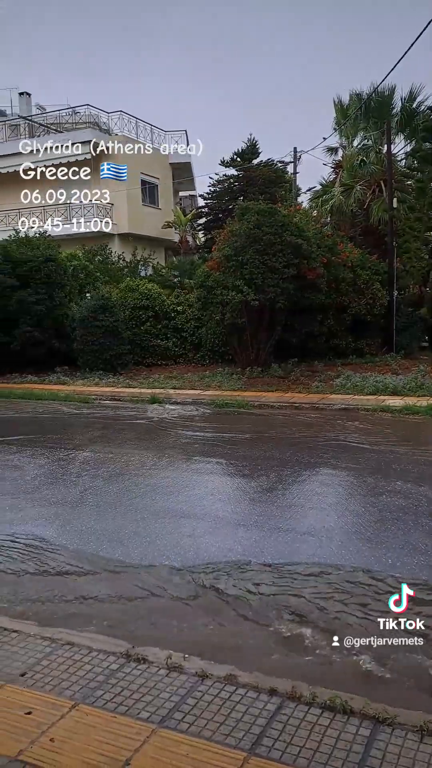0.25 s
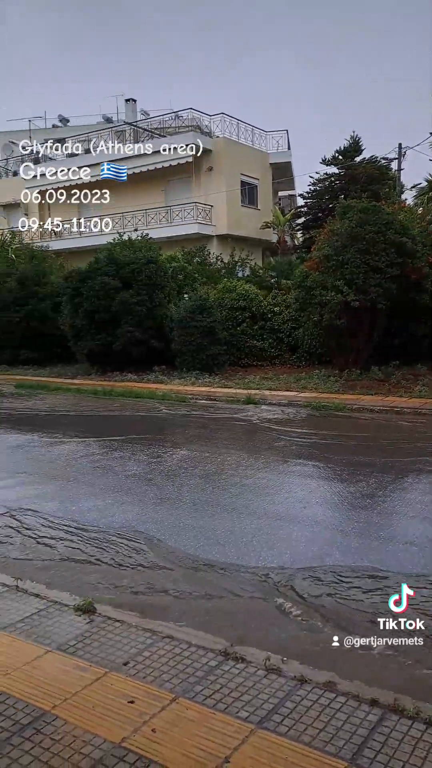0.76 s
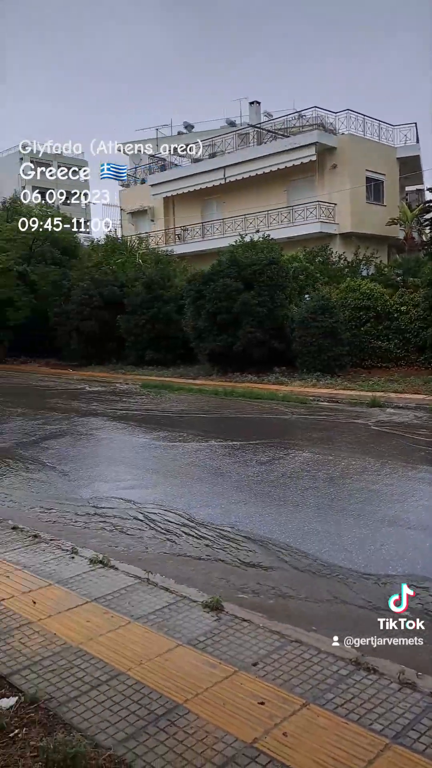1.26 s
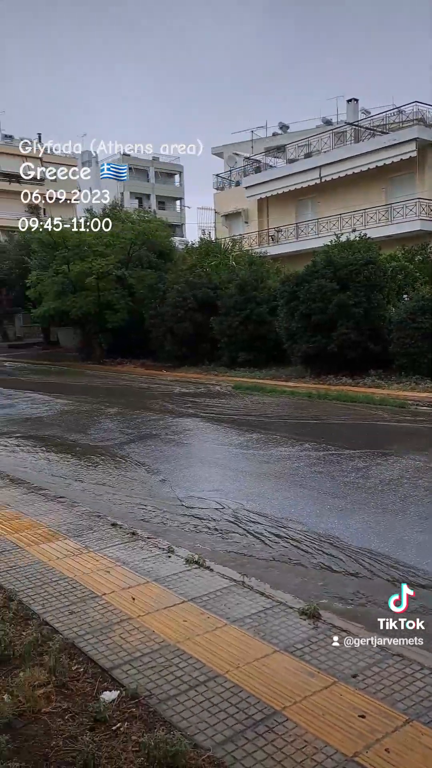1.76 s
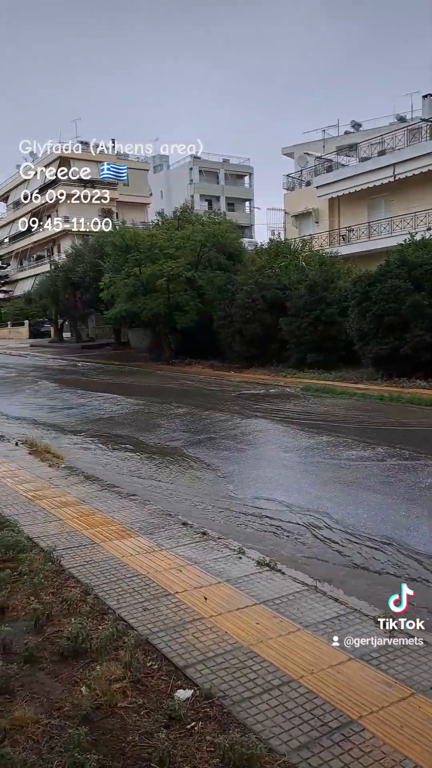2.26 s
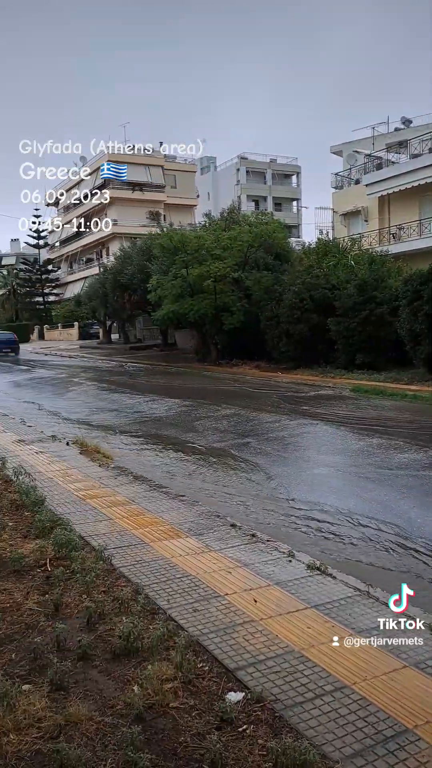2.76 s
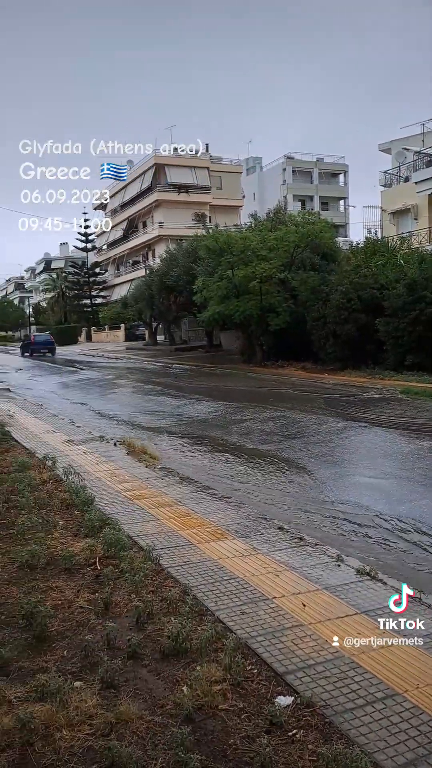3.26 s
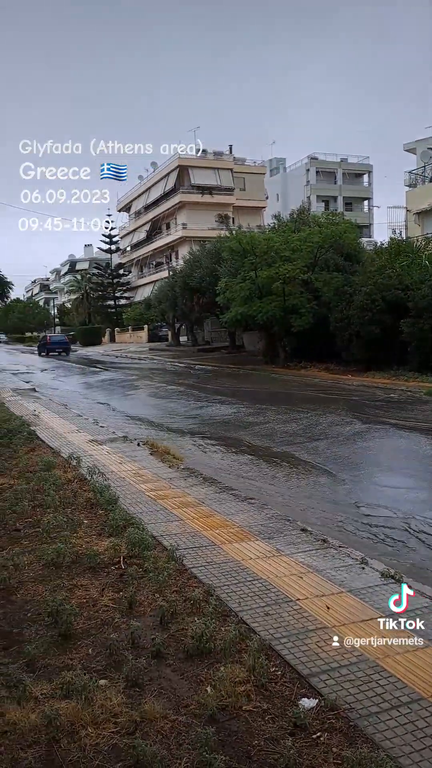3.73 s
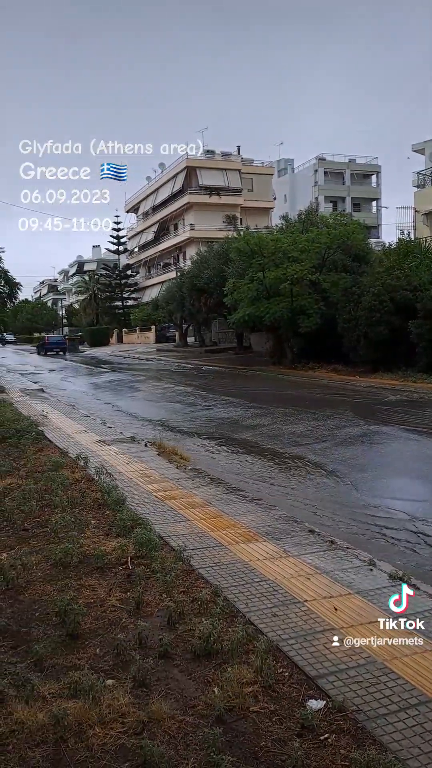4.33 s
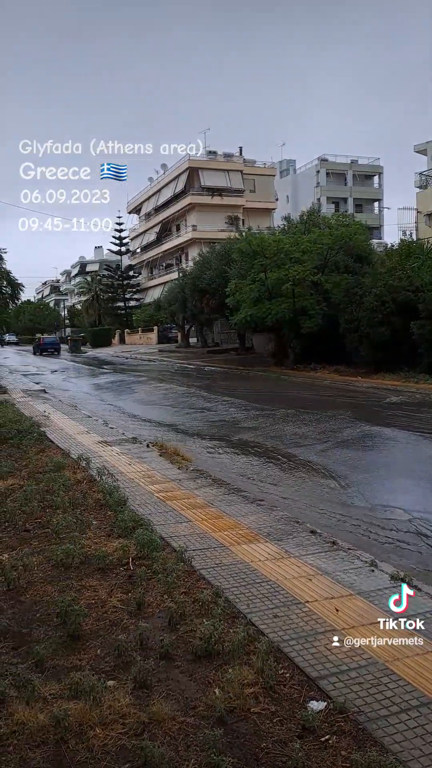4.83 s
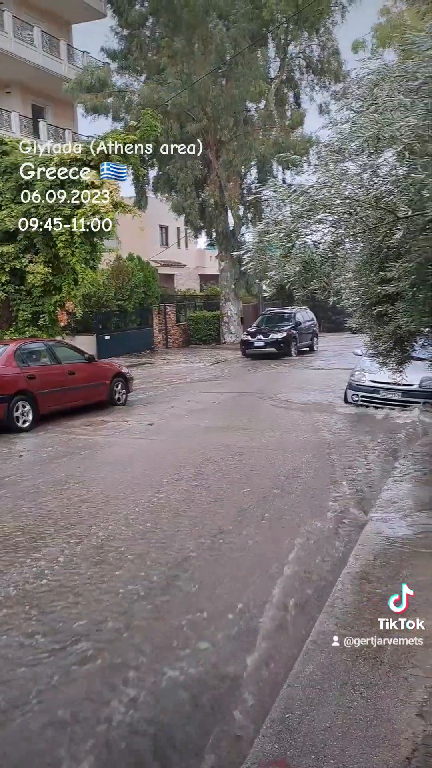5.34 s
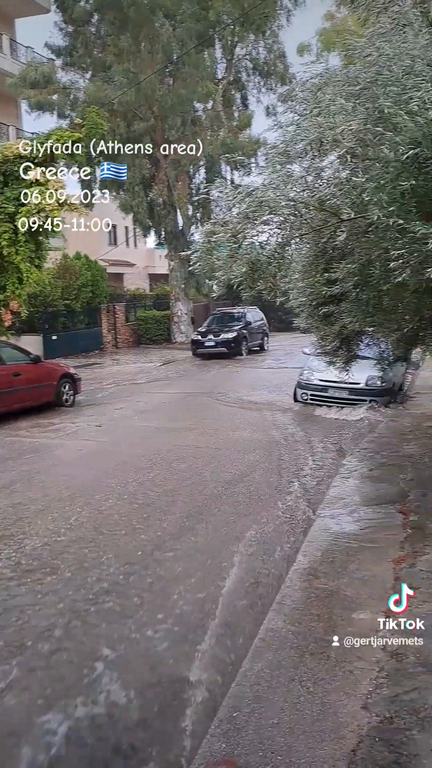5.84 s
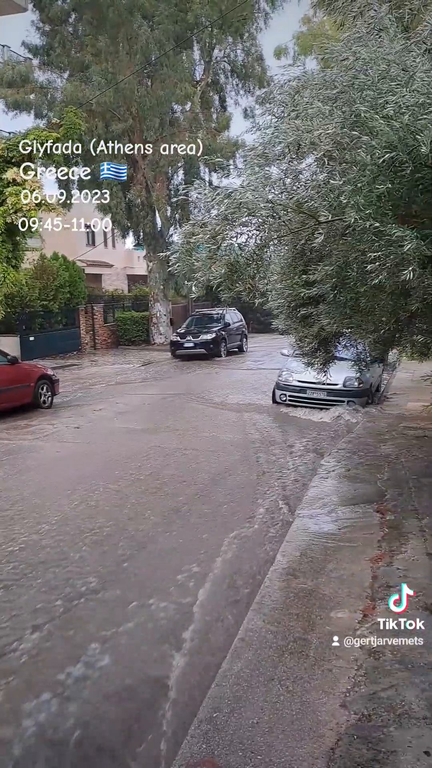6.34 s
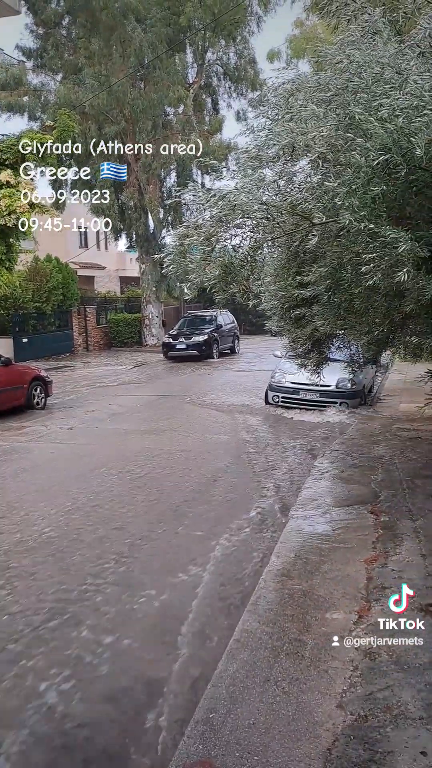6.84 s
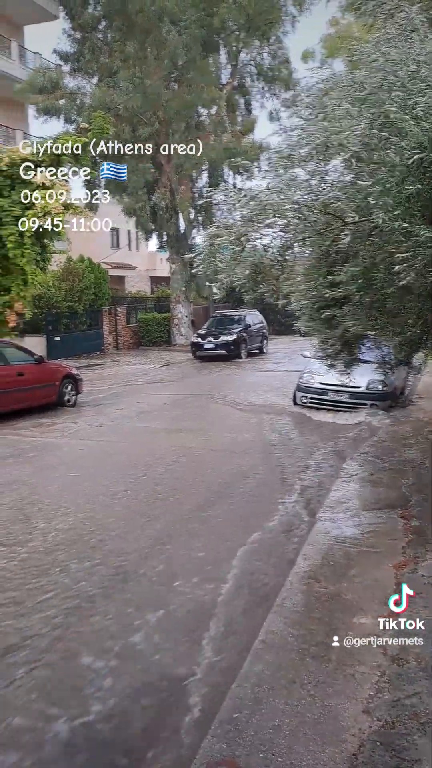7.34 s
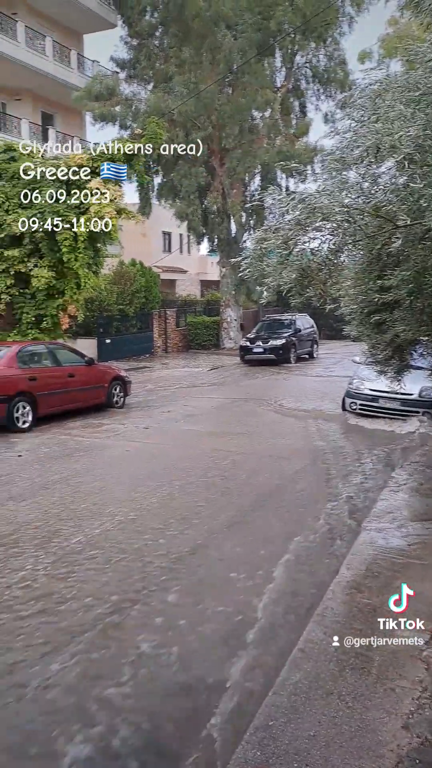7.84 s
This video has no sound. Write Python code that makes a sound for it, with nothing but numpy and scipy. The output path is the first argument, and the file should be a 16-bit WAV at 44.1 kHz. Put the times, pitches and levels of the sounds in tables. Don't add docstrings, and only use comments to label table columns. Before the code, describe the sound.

Tyres hiss through standing water on a wide road, muffled and lopsided, then a cut to a close rushing gutter torrent with ticking drops.

```python
import sys
import numpy as np
from scipy import signal
from scipy.fft import rfft, irfft
from scipy.io import wavfile
from scipy.ndimage import uniform_filter1d

SR = 44100
rng = np.random.default_rng(int(sys.argv[2]) if len(sys.argv) > 2 else 0)


def to_wav(s):
    ch = np.atleast_2d(s).T
    pcm = np.round(np.clip(ch, -1, 1) * 32767)
    wavfile.write(sys.argv[1], SR, pcm.astype(np.int16))


def how_loud(loudness_db):
    steps = np.asarray(loudness_db, float) / 20
    return 10 ** steps


N = 356769

# (time [s], level [dB])
FLOW = [
    [(0.02, 4.5), (0.6, 5), (1.3, 4.5), (2.0, 3), (2.55, 0.5), (2.8, -2.5), (3.5, -1.5), (4.222, -3.5)],
    [(4.223, -5), (4.65, -3.3), (4.86, -6.5)],
    [(5.0, -0.7), (5.1, 1), (5.3, -1.2), (5.8, -0.1), (6.3, -1.2), (7.25, -0.1), (8.07, -0.2)],
]
# (start [s], end [s], rise [s], fall [s], right port lag [samples])
VIEWS = [
    (-1.5, 3.0, 1.5, 1.5, 7),
    (1.5, 4.2225, 1.5, .001, 7),
    (4.2215, 4.9125, .001, .0004, 7),
    (4.9355, 8.1, .012, .001, 2),
]
# (frequency [Hz], road [0-1], gutter [0-1])
LIKENESS = [(60, .99, .97), (250, .96, .86), (650, .92, .7), (1100, .62, .2), (1600, .62, .2),
            (2600, .47, .25), (4000, .12, .08)]
# (time [s], delay [ms], strength [0-1])
GROUND = [(0, 1.06, 0.18), (0.5, 1.14, 0.22), (1.3, 1.25, 0.3), (2.2, 1.3, 0.25), (4.2, 1.36, 0.14),
          (4.9, 1.3, 0.12), (5, 1.3, 0.03)]
# (frequency [Hz], share [0-1])
FOLLOWS = [(90, 0.05), (900, 0.51), (3000, 0.83), (10000, 0.44)]
# (frequency [Hz], level [dB per Hz])
ROAD_BASS = [(20, -93), (32, -57), (48, -53.5), (105, -53), (175, -62), (250, -59)]
GUTTER_BASS = [(20, -77), (32, -60), (42, -49), (75, -50.5), (115, -57.5), (165, -59), (260, -54)]
# (frequency [Hz], level [dB per Hz])
BLOCKED_LEFT = [(330, -62), (480, -61.5), (810, -56.5), (1000, -48.5), (1110, -45.5), (1470, -61),
                (3170, -94), (3450, -184), (4550, -111.3), (6910, -118.0), (11410, -109.8), (15500, -118.0)]
WET_RIGHT = [(330, -59.5), (540, -67.5), (870, -61.5), (1420, -60), (1650, -58.5), (3000, -62.5),
             (3450, -57), (4000, -64.5), (6360, -85.5), (6910, -85.5), (10210, -78), (12410, -89),
             (13120, -99.1), (15070, -103.4), (15500, -118.0)]
TURNED_RIGHT = [(330, -59.5), (480, -64), (750, -60.5), (1010, -64), (1270, -61.5), (1470, -57.5),
                (2780, -60.5), (3650, -57), (6020, -86.5), (7310, -84.5), (8400, -79.5), (10210, -77),
                (12410, -92), (15500, -118.0)]
FILM_RIGHT = [(330, -62), (1220, -63.5), (1530, -59.5), (1840, -60.5), (2060, -60.5), (3170, -67.5),
              (4820, -62.5), (5380, -76), (6360, -83.5), (9390, -81), (11100, -70.5), (14260, -96),
              (14660, -118.0), (15500, -118.0)]
OPEN_LEFT = [(330, -54.5), (410, -55.5), (700, -52.5), (1090, -56), (1470, -55), (3750, -62), (5850, -61.5),
             (7310, -70.5), (12410, -73.5), (14660, -79.5), (15070, -81.8), (15500, -68)]
OPEN_RIGHT = [(330, -55), (520, -57.5), (720, -53.5), (940, -56), (1650, -54), (2780, -61.5), (4680, -62),
              (5380, -63.5), (7310, -68), (9930, -70), (12070, -58), (13870, -62.5), (15450, -62.5),
              (15750, -90)]
LEFT_TRIM_DB = [-1.4, 0.055, -0.38, 0.14]
# (time [s], peak level [dB], frequency [Hz])
ROAD_DROPS = [
    (0.7871, -33, 9500),
    (0.8854, -35, 9000),
    (1.484, -15, 9850),
    (2.3825, -41, 11000),
    (4.2213, -34, 9850),
]
GUTTER_DROPS = [(5.2632, -17, 13000), (5.3825, -17, 11900), (5.6174, -17, 12900), (5.7057, -11, 12400),
                (5.8145, -11, 14100), (5.8529, -12, 13500), (5.9901, -15, 12700), (6.0824, -7, 13600),
                (6.1752, -11, 14200), (6.2924, -20, 13700), (6.3193, -18.5, 12100), (6.3752, -16, 13400),
                (6.4465, -15, 13600), (6.6112, -12, 13800), (6.8791, -17, 12600), (6.896, -16, 14000),
                (6.9873, -13, 12800), (7.0357, -15, 12600), (7.156, -15, 12800), (7.2208, -20, 13100),
                (7.3989, -19, 12100), (7.4892, -19, 12100), (7.7391, -15, 12900), (7.789, -16, 13000)]
# (time [s], peak level [dB], frequency [Hz],
# left minus right [dB])
SPLASHES = [
    (5.124, -10.5, 800, 6),
    (5.749, -16, 1050, -9),
    (6.443, -12.5, 790, 1.5),
    (7.279, -10, 771, -7),
    (5.62, -17, 750, 0),
    (7.95, -15, 790, 0),
            (0.1164, -11, 2010, -19),
    (0.828, -6, 3420, -41),
    (1.0395, -26, 3300, -22),
    (1.8682, -15, 1650, -17),
    (1.9535, -12, 3130, -24),
    (3.5325, -11, 3700, -37),
]
PLINKS = [
    (2.5283, -30, 5900, -30),
    (6.393, -17, 3900, 1),
    (6.869, -21, 3760, 0),
]
# (start [s], length [s], first frequency [Hz], last frequency [Hz], level [dB])
MOTORS = [(0.1, 0.86, 238, 253, -44), (0.298, 0.85, 307, 326.6, -43.5), (0.3, 0.78, 98, 93.6, -39.5),
          (0.65, 0.87, 190, 204, -46), (1.3, 0.64, 47, 55.9, -39), (1.8, 1.16, 150.3, 167.2, -43.5),
          (2.152, 0.94, 46.6, 54.5, -39), (2.395, 2.6, 101, 128, -43.5), (3.397, 1.1, 45, 55.3, -40),
          (4.8, 1.5, 198.4, 196, -41), (4.9, 1.2, 46.8, 45.6, -36.5), (5.4, 0.38, 64.2, 67.6, -32.5),
          (6.296, 0.6, 60.9, 67.8, -34), (6.845, 1.15, 68.6, 66.5, -33), (6.8, 1.45, 195.6, 197, -45.5),
          (7.45, 0.57, 83, 78.3, -44)]

GUTTER_START_S = VIEWS[-1][0]
MOTOR_FADE_S = 0.12
RIGHT_VENT_HZ, SELF_NOISE_DB = 32, -59


def water(grain_share, bubble_share, patchy_db, surge_db):
    swell_db, = in_time(np.vstack(FLOW))
    gutter = np.arange(N) / SR > GUTTER_START_S
    grain = np.clip(grain_share, 0, 1)
    rain = np.array([impacts(per_s=2500, spread_db=3.5), impacts(per_s=3800, spread_db=12.5)])
    white = np.sqrt(1 - grain) * rng.standard_normal((2, 2, N)) + np.sqrt(grain) * rain
    pops = impacts(per_s=1500, spread_db=4)
    dealt = rng.integers(0, 20, N)
    surge = drift(4.0) + 0.8 * drift(14.0)
    edges = 15 * 2 ** np.arange(0, 10.1, 0.5)
    out = 0
    for k, (low, high) in enumerate(zip(edges, np.r_[edges[1:-1], 17500])):
        band = signal.butter(2, [low, high], "band", fs=SR, output="sos")
        mid, side = signal.sosfilt(band, white[k % 2])
        hz = np.sqrt(low * high)
        if 400 < hz < 5000:
            bubbles = rms_one(ring(pops * (dealt == k), hz * rng.uniform(0.87, 0.98), 5.1 / hz))
            mid = np.sqrt(1 - bubble_share) * mid + np.sqrt(bubble_share) * np.std(mid) * bubbles
        alike = np.where(gutter, at_hz(LIKENESS, hz, order=2), at_hz(LIKENESS, hz))
        alike = np.clip(alike, 0, 1)
        bright = np.clip(np.log2(hz / 250) / 4, 0, 1)
        flicker_db = bright * (surge_db * surge + patchy_db * drift(30.0))
        gain = how_loud(at_hz(FOLLOWS, hz) * swell_db + flicker_db)
        stereo = np.sqrt((1 + alike) / 2) * mid + np.sqrt((1 - alike) / 2) * side * [[1], [-1]]
        out = out + gain * stereo
    return out


def impacts(per_s, spread_db):
    sizes = how_loud(spread_db * np.minimum(rng.exponential(1, N), 3)) * rng.choice([-1, 1], N)
    return rms_one(sizes * (rng.random(N) < per_s / SR))


def ground_echo(x):
    delay_ms, strength = in_time(GROUND)
    late = [np.interp(np.arange(N) - delay_ms * SR / 1000, np.arange(N), c) for c in x]
    return (x + strength * np.array(late) * [[0.1], [1]]) / np.sqrt(1 + strength ** 2)


def ports(wash):
    t, out = np.arange(N) / SR, np.zeros((2, N))
    road = [(ROAD_BASS, BLOCKED_LEFT, right) for right in (WET_RIGHT, TURNED_RIGHT, FILM_RIGHT)]
    colours = road + [(GUTTER_BASS, OPEN_LEFT, OPEN_RIGHT)]
    vented = signal.lfilter(*signal.butter(1, RIGHT_VENT_HZ, "high", fs=SR), wash[1])
    for view, (bass, left, right), trim_db in zip(VIEWS, colours, LEFT_TRIM_DB):
        start, end, rise, fall, lag = view
        part = slice(max(round((start - 0.2) * SR), 0), round(end * SR))
        gate = np.clip((t[part] - start) / rise, 0, 1) * np.clip((end - t[part]) / fall, 0, 1)
        trimmed = [(hz, db + trim_db) for hz, db in left]
        out[0, part] += gate * colour(wash[0, part], bass + trimmed)
        out[1, part] += gate * np.roll(colour(vented[part], bass + right), lag)
    return out


def drops(events, t60, thud_db, bounce_db, left_db):
    out, click = np.zeros(N + 900), np.zeros(900)
    click[0] = 1
    click[round(0.0011 * SR)] = how_loud(bounce_db)
    thud = how_loud(thud_db) * ring(click, 1500, 0.0022)
    for s, db, hz in events:
        tick = 0.64 * ring(ring(click, hz, t60), hz * 1.07, t60)
        at = round((s + 0.001) * SR)
        out[at:at + 900] += how_loud(db) * (tick + thud)
    return out[:N] * how_loud([[left_db], [0]])


def splashes(events, cycles):
    out, t = np.zeros((2, N + 900)), np.arange(900) / SR
    for s, db, hz, pan_db in events:
        age = t * hz / cycles
        swell = age * np.exp(1 - age)
        bubble = how_loud(db) * swell * np.sin(2 * np.pi * hz * t * (0.96 + 0.0088 * age))
        at = round(s * SR)
        out[:, at:at + 900] += bubble * how_loud([[min(pan_db, 0)], [min(-pan_db, 0)]])
    return out[:, :N]


def motor(start, length, first_hz, last_hz, level_db, wobble_db):
    t = np.arange(N) / SR - start
    on = np.clip(np.minimum(t, length - t) / MOTOR_FADE_S, 0, 1)
    hz = np.interp(t, [0, length], [first_hz, last_hz])
    level = np.sqrt(2) * how_loud(level_db + wobble_db * drift(3.9))
    return on * level * np.sin(2 * np.pi * np.cumsum(hz) / SR)


def capsule_hiss():
    return how_loud(SELF_NOISE_DB) * rng.standard_normal(N) * [[0], [1]]


def scene_change():
    t = np.arange(N) / SR
    return (t > VIEWS[2][1]) & (t < VIEWS[3][0])


def rms_one(x):
    return x / np.sqrt(np.mean(x ** 2) + 1e-20)


def in_time(rows):
    s, *columns = np.transpose(rows)
    return [np.interp(np.arange(N) / SR, s, c) for c in columns]


def at_hz(points, hz, order=1):
    points = np.array(points)
    return np.interp(np.log(hz), np.log(points[:, 0]), points[:, order])


def drift(rate):
    r = np.exp(-80 * np.pi * rate / SR)
    noise = rng.standard_normal(N // 40 + 2002)
    slow = signal.lfilter([1], [1, -2 * r, r * r], noise)[2000:]
    return np.interp(np.arange(N) / 40, np.arange(len(slow)), rms_one(slow))


def ring(clicks, hz, t60):
    r, w = how_loud(-60 / (t60 * SR)), 2 * np.pi * hz / SR
    return signal.lfilter([0, np.sin(w)], [1, -2 * r * np.cos(w), r * r], clicks + 1e-18)


def colour(x, spectrum):
    size = 8192
    hz = np.maximum(np.arange(size // 2 + 1) * SR / size, 1)
    skirt_db = 12 * np.log2(np.minimum(hz / 20, 1))
    cepstrum = irfft(np.log(how_loud(at_hz(spectrum, hz) + skirt_db) * np.sqrt(SR / 2)))
    cepstrum[1:size // 2] *= 2
    cepstrum[size // 2 + 1:] = 0
    return signal.oaconvolve(x, irfft(np.exp(rfft(cepstrum))))[:len(x)]


def scene():
    wash = ground_echo(water(grain_share=0.078, bubble_share=0.11, patchy_db=0.63, surge_db=0.54))
    ticks = drops(ROAD_DROPS, t60=0.0012, thud_db=-5, bounce_db=-24, left_db=-60)
    ticks += drops(GUTTER_DROPS, t60=0.0017, thud_db=-14, bounce_db=-8, left_db=-22)
    bubbles = how_loud(-4) * (splashes(SPLASHES, cycles=2) + splashes(PLINKS, cycles=7))
    hum = sum(motor(*row, wobble_db=1.0) for row in MOTORS) * ~scene_change()
    return ports(wash) + how_loud(6) * ticks + bubbles + hum + capsule_hiss()


def thin_treble(x, road_db, gutter_db, wobble_db, scatter_db, thin, from_hz):
    lead = 364
    frames = dict(nperseg=2048, noverlap=1024, window="cosine", scaling="psd")
    hz, s, lines = signal.stft(np.pad(x, ((0, 0), (lead, 0))), SR, **frames)
    s = s - lead / SR
    hz_column = hz[:, None]
    road = s < GUTTER_START_S
    power = 2 * abs(lines) ** 2
    cell = uniform_filter1d(power, size=8, axis=1)[:, ::8]
    cell_lines = cell.repeat(8, axis=1)[:, :len(hz)]

    luck = rng.standard_normal(cell.shape[1:]) + 0.5 * rng.standard_normal(len(s))
    luck = uniform_filter1d(luck, size=3, axis=1)
    limit_db = np.where(road, np.reshape(road_db, (2, 1, 1)), np.reshape(gutter_db, (2, 1, 1)))
    wobble = np.interp(s, np.arange(N) / SR, drift(6.0))
    limit_db = limit_db + wobble_db * wobble + scatter_db * luck
    limit_db = limit_db - 5 * (hz[::8, None] > 13600) * road

    dropped = (cell < how_loud(2 * limit_db)).repeat(8, axis=1)[:, :len(hz)] & (hz_column > from_hz)
    weak = (power < thin * cell_lines) & (hz_column > 5500)
    loud_drops = [row[0] for row in ROAD_DROPS + GUTTER_DROPS if row[1] > -18]
    hits = np.array(loud_drops + [GUTTER_START_S])
    calm = np.min(abs(s[:, None] - hits), axis=1) > 0.02
    lines[(dropped | weak) & calm] = 0

    unlucky = (luck > 0.62).repeat(8, axis=0)[:len(hz)]
    no_sum = unlucky & (hz_column > from_hz) & (hz_column < 10300) & ~road
    lines -= no_sum * lines.mean(axis=0)
    out = signal.istft(lines, SR, **frames)[1][:, lead:N + lead]
    return out * np.where(scene_change(), 0.004, 1)


def band_limit(x):
    return signal.sosfilt(signal.butter(12, 16480, fs=SR, output="sos"), x)


def record(dry):
    low_pass = signal.cheby2(14, 60, 15950, fs=SR, output="sos")
    dull = signal.sosfilt(low_pass, np.clip(dry, -0.8, 0.8))
    mix = thin_treble(dull, road_db=[-113.5, -94.5], gutter_db=[-78.5, -75.3], wobble_db=0.6,
                      scatter_db=4.5, thin=0.45, from_hz=6300)
    return band_limit(mix)


dry = scene()
out = record(dry)
to_wav(out)
```